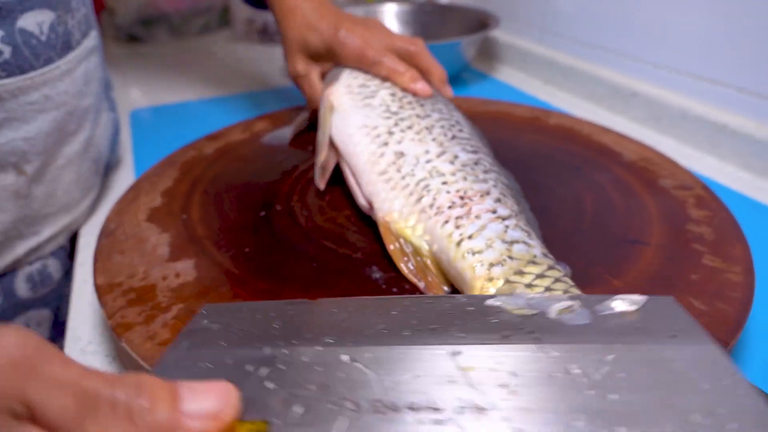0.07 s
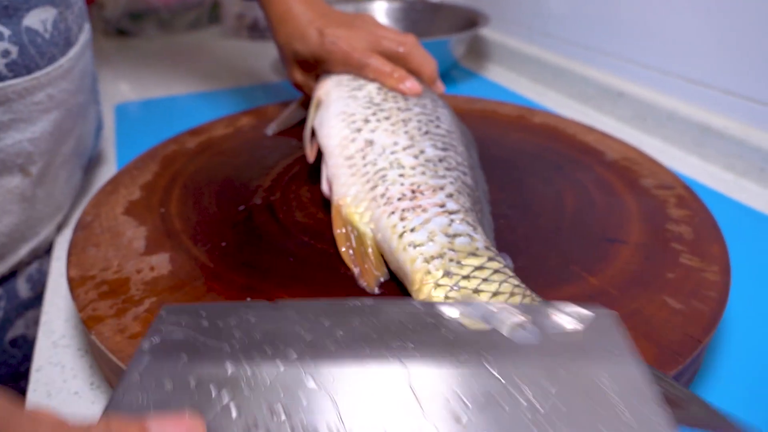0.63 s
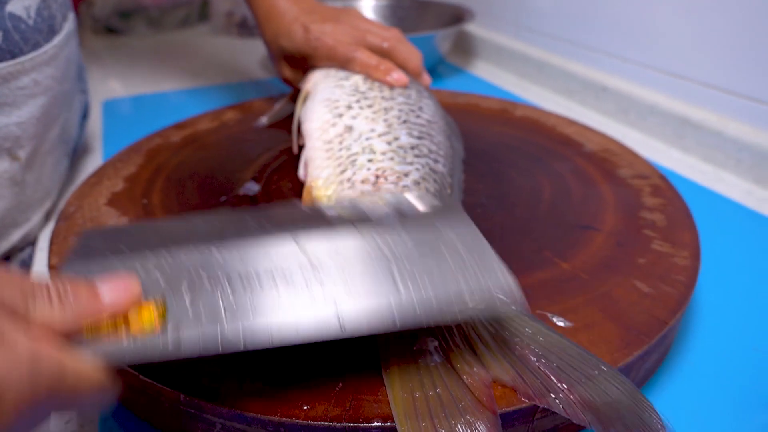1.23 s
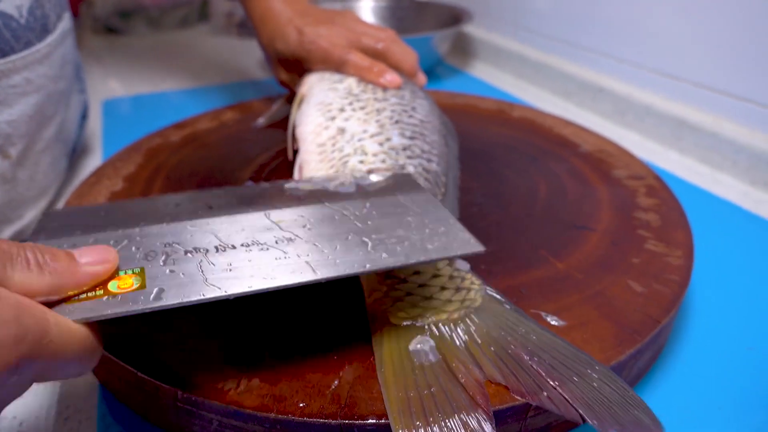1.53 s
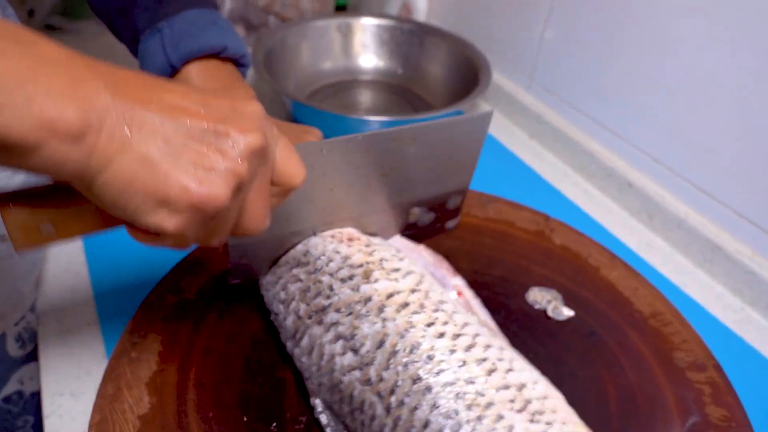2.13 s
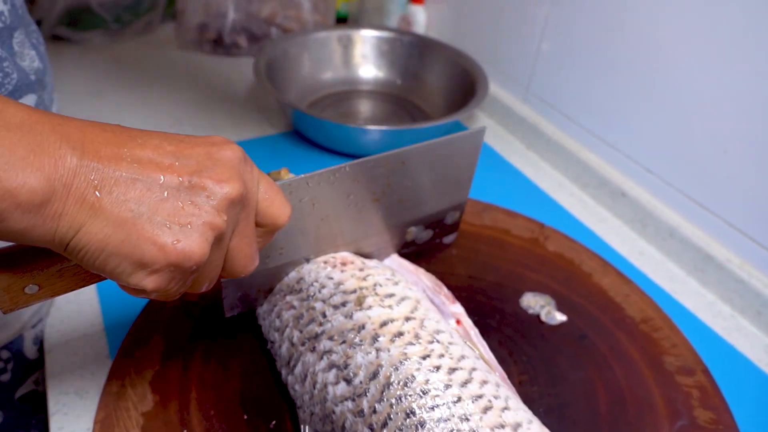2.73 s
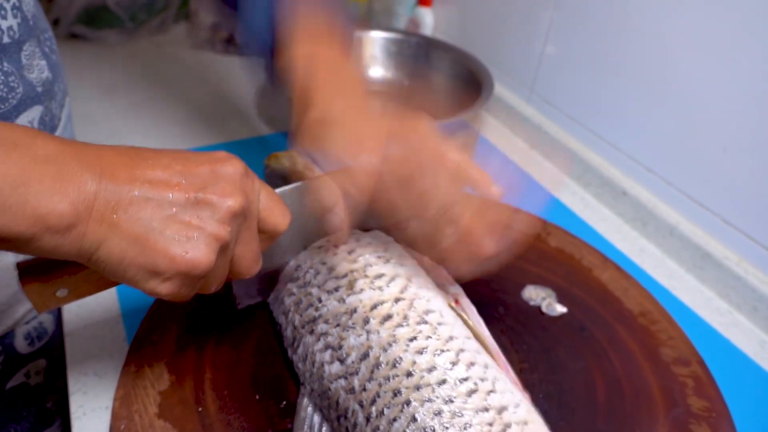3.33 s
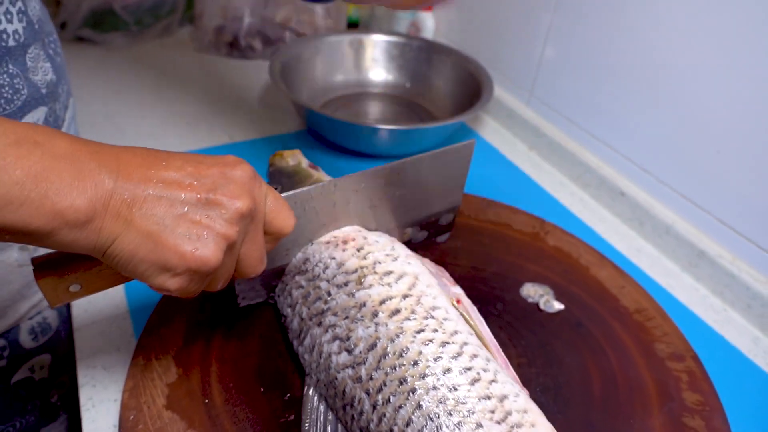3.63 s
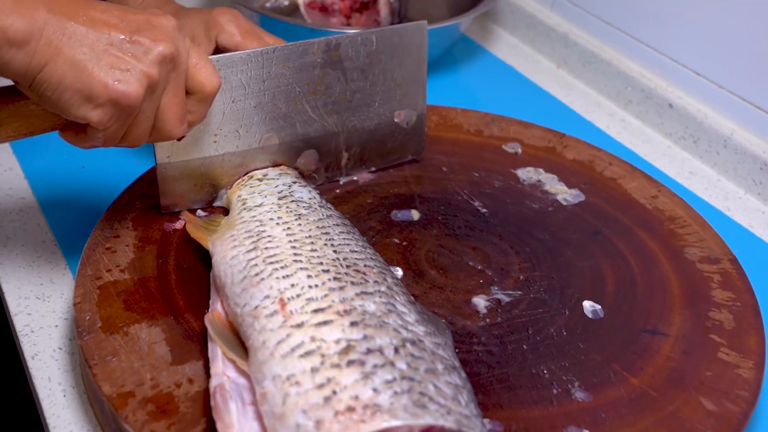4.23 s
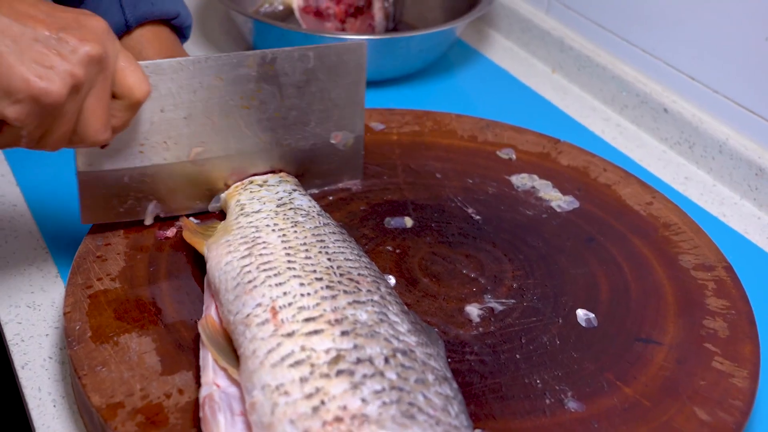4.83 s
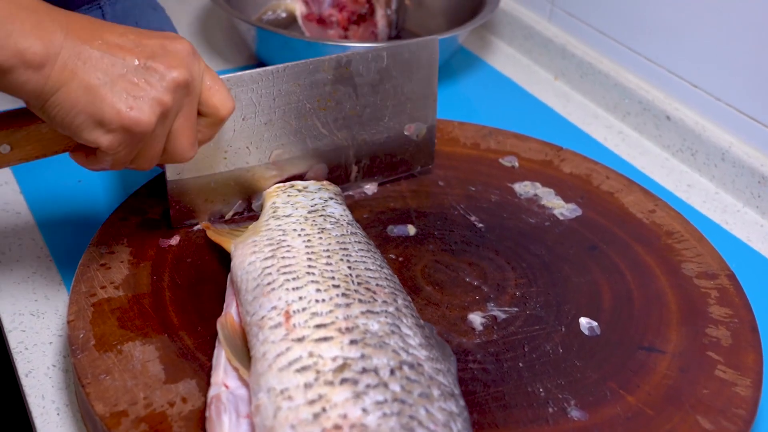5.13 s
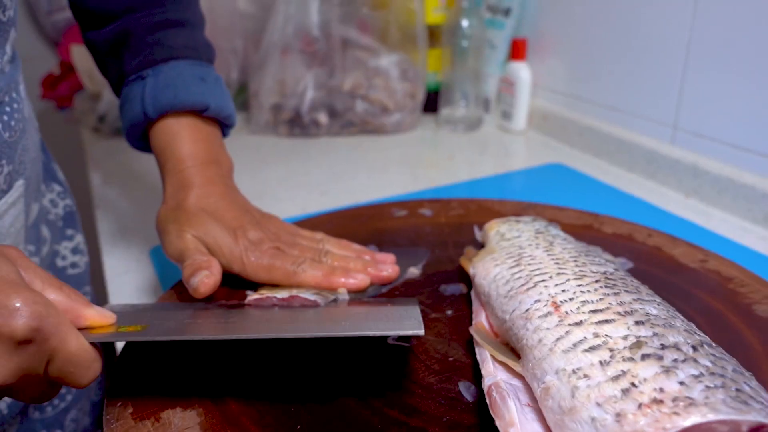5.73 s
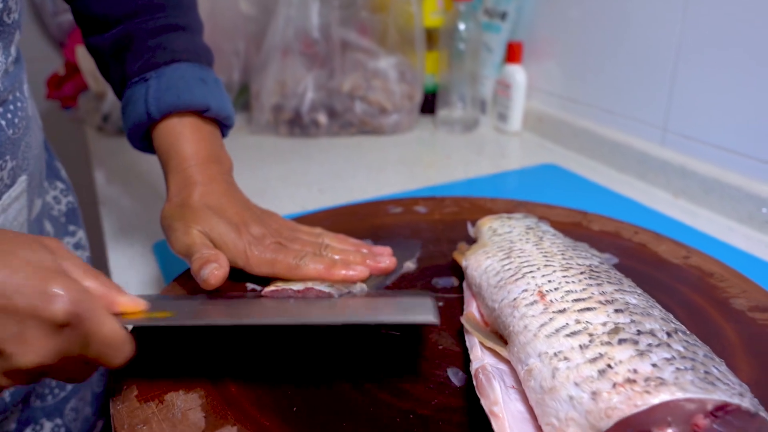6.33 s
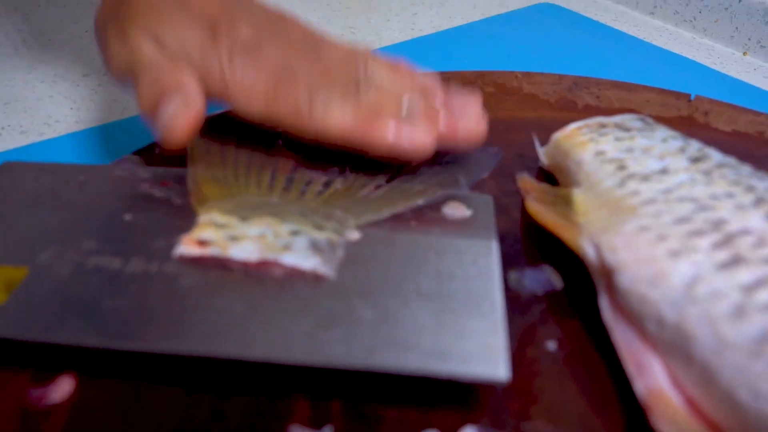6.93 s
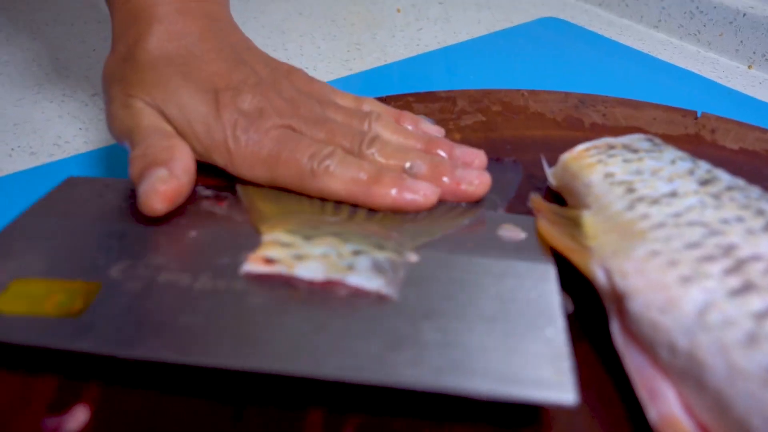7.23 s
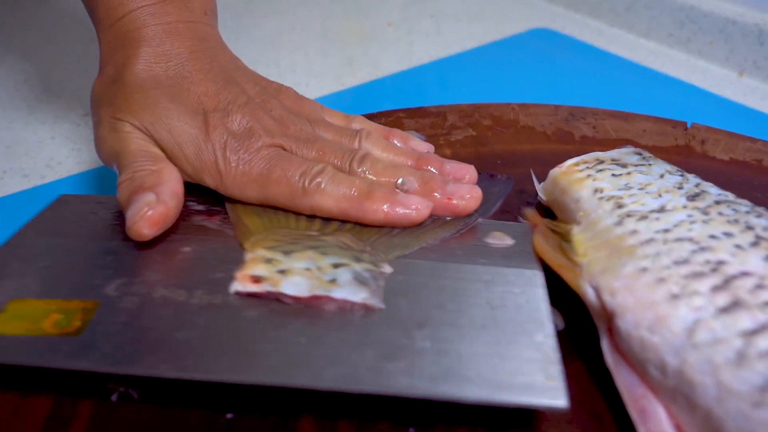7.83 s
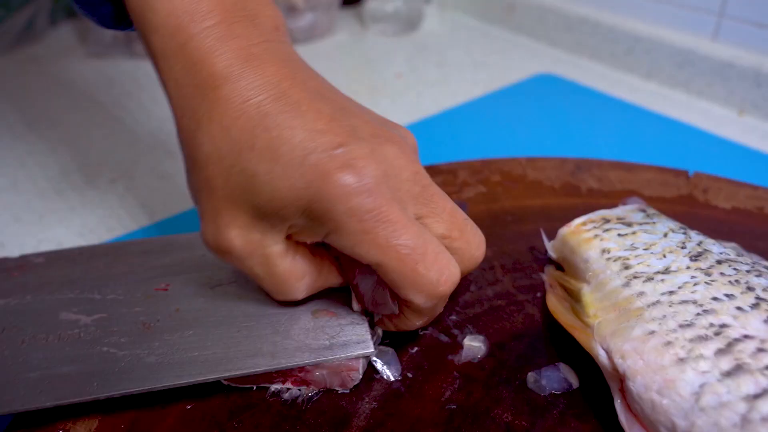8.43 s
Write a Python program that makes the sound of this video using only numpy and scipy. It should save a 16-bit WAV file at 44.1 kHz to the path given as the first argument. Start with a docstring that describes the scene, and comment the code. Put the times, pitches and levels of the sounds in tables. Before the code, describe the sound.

Crisp fish scaling strokes, crunching chops with wooden knocks, and a flat blade hissing back and forth in a small kitchen.

```python
"""A small tiled kitchen, a hand-held microphone close to a fish on a thick wooden board; air and a low hum.
First nine cleaver strokes rip scales off, crackling and snapping over the squelch of wet skin.
From 3 s the blade is pounded through backbone and tail: bone crunches, the board knocks, the counter thuds.
From 5.4 s it slides flat to and fro under the tail fin, hissing on the wet wood,
and from 7 s it rasps as it sticks and slips."""
import sys
import numpy as np
from scipy import signal
from scipy.fft import rfft, irfft, next_fast_len
from scipy.io import wavfile
from scipy.ndimage import uniform_filter1d, minimum_filter1d

SR = 44100
rng = np.random.default_rng(int(sys.argv[2]) if len(sys.argv) > 2 else 0)


def bounce(signal):
    """Save signal as a 16-bit WAV file at the path given by the first command-line argument."""
    frames = np.transpose(np.atleast_2d(signal))
    limited = np.clip(frames, -1, 1)
    pcm = np.round(limited * 32767).astype(np.int16)
    wavfile.write(sys.argv[1], SR, pcm)


N = 382788
TIME = np.arange(N) / SR
TOP_HZ = 16000

# strokes against the scales, flicks then longer draws: t/s, rise/s, fall/s, crackle/dB, flesh/dB, thud/dB
SCALING_STROKES = [(.268, .014, .02, -25.5, -35.5, -20), (.494, 0.011, .03, -17.5, -35.5, -19),
                   (.738, .012, .02, -19, -30.5, -28), (.969, 0.0082, .062, -17, -38, -29),
                   (1.208, 0.039, 0.097, -26.5, -45.5, -33), (1.483, 0.028, .08, -24.5, -43, -29),
                   (1.718, 0.034, .055, -21, -40.5, -29), (1.9, 0.1, .075, -26.5, -32, -29),
                   (2.255, .06, .085, -33, -32.5, -38)]
# the edge leant through skin and bone: t/s, rise/s, fall/s, crackle/dB, flesh/dB
SLOW_CUTS = [(2.15, .02, .2, -46, -48), (3.208, .015, .055, -28.5, -37.5), (4.53, 0.1, .15, -33.5, -43),
             (4.828, .01, .1, -40, -58), (4.89, 0.18, .05, -30.5, -26)]
# dull spectrum of flesh under the edge: f/Hz, level/dB
FLESH_SPECTRUM = [(60, -18), (150, 0), (330, -2.5), (700, -8), (1200, -12.5), (2000, -18), (5000, -28)]


def undb(db):
    """Decibels to gain."""
    return 10 ** (np.asarray(db) / 20)


def unit(x):
    """Scale to rms 1."""
    return x / np.sqrt(np.mean(x ** 2) + 1e-18)


def add(track, s, x):
    """Mix a sound into a track at s seconds."""
    i = max(int(s * SR), 0)
    track[i:i + len(x)] += x[:N - i]


def convolve(x, response):
    """Pass a track through a response."""
    return signal.fftconvolve(x, response)[:N]


def on_log_axis(hz, points):
    """Read (Hz, value) points along a log-frequency axis."""
    at, value = np.transpose(points)
    return np.interp(np.log(hz + 1e-3), np.log(at), value)


def colour(points, size=2048):
    """Minimum-phase response of energy 1 with a given spectrum."""
    gain = undb(on_log_axis(np.fft.rfftfreq(size, 1 / SR), points))
    cepstrum = irfft(np.log(gain))
    cepstrum[1:size // 2] *= 2
    cepstrum[size // 2 + 1:] = 0
    return unit(irfft(np.exp(rfft(cepstrum)))) / np.sqrt(size)


def noise(points):
    """Steady noise of rms 1 with a given spectrum."""
    size = next_fast_len(N, real=True)
    gain = undb(on_log_axis(np.fft.rfftfreq(size, 1 / SR), points))
    return unit(irfft(rfft(rng.standard_normal(size)) * gain, size)[:N])


def resonate(x, hz, q):
    """One resonance, gain 1 at its centre."""
    hz = min(hz, SR / 3)
    return signal.lfilter(*signal.iirpeak(hz, max(q, 3 * hz / SR), fs=SR), x)


def fade(t, t60):
    """Exponential decay, 60 dB down after t60 seconds."""
    return np.exp(-np.log(1000) * t / t60)


def background(air_db=-49.5, hum_db=-52, hum_hz=107):
    """Room air, a low wavering hum and the handling rumble of the microphone."""
    air_spectrum = [(53, -32), (90, -3.5), (125, -2), (239, -11), (316, -9.5), (532, -20.5), (1210, -22),
                    (1870, -26.5), (2710, -26), (8720, -31.5), (10600, -39.5), (13700, -38), (16000, -47)]  # room tone: f/Hz, level/dB
    rumble_spectrum = [(3, -15), (8, 0.5), (14, -2), (25, -14.5), (45, -22.5), (100, -32.5), (200, -51),
                       (500, -83)]  # handling noise: f/Hz, level/dB
    handling = [(0, -29.5), (4.05, -30), (5.4, -37), (6.3, -37), (6.9, -29), (8.68, -34)]  # course of the handling noise: t/s, level/dB
    hum = undb(hum_db) * unit(resonate(rng.standard_normal(N), hum_hz, q=7.6))
    air = undb(air_db) * noise(air_spectrum)
    rumble = undb(np.interp(TIME, *np.transpose(handling))) * noise(rumble_spectrum)
    return air + hum + rumble


def kitchen(x, wet_db, build_s):
    """Direct sound plus dense reflections off the tiles, which build quickly and last longest in the bass."""
    decay_times = [(100, 0.63), (400, 0.42), (1500, 0.31), (5000, 0.31), (9000, 0.3), (15000, 0.19)]  # reverberation of the room: f/Hz, t60/s
    t = TIME[:SR // 2]
    spectrum, hz = rfft(rng.standard_normal(len(t))), np.fft.rfftfreq(len(t), 1 / SR)
    centres = np.array(decay_times)[:, 0]
    tail = np.zeros(len(t))
    for share, (_, t60) in zip(np.eye(len(centres)), decay_times):
        band = irfft(spectrum * on_log_axis(hz, np.c_[centres, share]), len(t))
        tail += band * fade(t, t60)
    tail *= 1 - np.exp(-(t / build_s) ** 2)
    return x + undb(wet_db) * convolve(x, unit(tail) / np.sqrt(len(t)))


def ring(modes, detune=0., scatter_db=0.):
    """Struck modes; each strike meets them at a slightly different place and load."""
    t = TIME[:SR * 3 // 4]
    out = np.zeros(len(t))
    for k, (hz, db, t60) in enumerate(modes):
        place, load = rng.standard_normal(2)
        tone = np.sin(2 * np.pi * hz * (1 + detune * load) * t)
        out += (-1) ** k * undb(db + scatter_db * place) * fade(t, t60) * tone
    return out


def favour(modes, hz, db_per_octave=14, ring_share=1):
    """Contact excites the modes near hz most; a leaning hand cuts their ring to a share of its length."""
    return [(f, db - db_per_octave * abs(np.log2(f / hz)), t60 * ring_share) for f, db, t60 in modes]


def friction(strokes, column, per_s, spread_db, hiss, shape, catch_db, catch_s=.004):
    """Tiny uneven breaks over a hiss; each stroke swells to the level in its `column` and dies away."""
    breaks = (rng.random(N) < per_s / SR) * rng.choice([-1, 1], N)
    sizes = undb(spread_db * np.minimum(rng.exponential(size=N), 4))
    grit = unit(breaks * sizes) + hiss * rng.standard_normal(N)
    # the edge catches and lets go, so the grit comes in clusters
    grit *= undb(catch_db * unit(uniform_filter1d(rng.standard_normal(N), int(catch_s * SR))))
    out = np.zeros(N)
    for stroke in strokes:
        start, rise, fall = stroke[:3]
        during = slice(int(start * SR), int((start + rise + fall) * SR))
        push = np.interp(TIME[during] - start, [0, rise, rise + fall], [0, 1, 0]) ** shape
        out[during] += undb(stroke[column]) * unit(push * grit[during]) * np.sqrt(np.mean(push ** 2))
    return out


def mottle(x, depth_db, hold_s, bands=14):
    """Each break has its own size and pitch: neighbouring bands flare up at different moments."""
    size = next_fast_len(N, real=True)
    spectrum, hz = rfft(x, size), np.fft.rfftfreq(size, 1 / SR)
    centres = np.geomspace(1000, TOP_HZ, bands)
    out = np.zeros(N)
    for share in np.eye(bands):
        band = irfft(spectrum * on_log_axis(hz, np.c_[centres, share]), size)[:N]
        flare = unit(uniform_filter1d(rng.standard_normal(N), int(hold_s * SR)))
        out += band * unit(undb(depth_db * flare))
    return out


def squelches(jerks_per_s=900, q=2.3):
    """Wet skin drags over wood or steel in tiny jerks: a brief, roughly pitched squelch."""
    skin_drags = [(0.036, 0.31, 540, -47.5), (0.332, .061, 720, -43), (.894, .053, 728, -42.5),
                  (1.023, 0.057, 800, -43), (2.231, 0.055, 470, -41), (2.3, .09, 720, -32),
                  (4.94, 0.15, 3500, -29.5), (6.515, .14, 2900, -53)]  # squelches and squeaks: t/s, length/s, f/Hz, level/dB
    out = np.zeros(N)
    jerks = rng.standard_normal(N) * (rng.random(N) < jerks_per_s / SR)
    for s, length, hz, db in skin_drags:
        drag = jerks[int(s * SR):int((s + length) * SR)]
        pitched = unit(resonate(resonate(drag, hz, q), hz, q))
        add(out, s, undb(db) * np.hanning(len(drag)) * pitched)
    return out


def to_and_fro(bout, push_db=1.5):
    """Evenly paced strokes of the flat blade, louder pushes and softer pulls in turn."""
    bearing = [(5.46, -38.5, -47.5), (5.82, -37, -52), (6., -36, -46), (7.17, -58.5, -42.5),
               (7.32, -44.5, -36.5), (8.06, -45.5, -37), (8.21, -52, -41)]  # how hard the blade bears on the wood: t/s, hiss/dB, rasp/dB
    first, end, period, rise, fall = bout
    at, hiss_db, rasp_db = np.transpose(bearing)
    strokes = []
    for k, s in enumerate(np.arange(first, end, period)):
        accent_db = (-1) ** k * push_db
        strokes.append((s, rise * period, fall * period,
                        np.interp(s, at, hiss_db) + accent_db, np.interp(s, at, rasp_db) + accent_db))
    return strokes


def sliding(sing=0.4, sing_hz=8400):
    """Flat steel hisses over wet wood; pressed harder it rasps."""
    # two bouts of sliding: first push/s, end/s, period/s, rise/share, fall/share
    hissing_bout = (5.462, 6.1, .178, .3, .48)
    rasping_bout = (7.176, 8.3, .149, .46, .33)
    # blade set down, jabbed, drawn back, stopped and lifted clear: t/s, rise/s, fall/s, hiss/dB, rasp/dB
    single_moves = [(5.369, 0.0096, 0.031, -44, -51), (6.153, .022, .087, -38, -49),
                    (6.34, .094, .041, -46.5, -47), (6.52, .195, .03, -55, -52),
                    (8.346, .037, 0.0077, -49, -40.5), (8.535, .025, .11, -49, -59)]
    # spectra of steel on wet wood: f/Hz, level/dB
    hiss_spectrum = [(180, -38.5), (300, -4), (343, -9), (379, -3), (462, -3), (634, -17), (870, -10),
                     (2440, -11), (3080, -8), (6100, -8), (6850, -12), (8220, -5.5), (10000, -16),
                     (12300, -13.5), (16000, -19)]
    rasp_spectrum = [(240, -35), (400, -18.5), (700, -18), (1010, -14), (1260, 0.5), (1590, -8.5),
                     (1890, -4.5), (2070, -8), (2540, -6), (3760, -12.5), (4280, -12.5), (5490, -21),
                     (9000, -29), (11700, -47), (19800, -120)]
    strokes = to_and_fro(hissing_bout) + to_and_fro(rasping_bout) + single_moves
    hiss = friction(strokes, column=3, per_s=2200, spread_db=2, hiss=0.75, shape=0.54, catch_db=2.1)
    hiss += sing * resonate(hiss, sing_hz, q=29)  # the thin edge sings a little
    rasp = friction(strokes, column=4, per_s=1000, spread_db=3.5, hiss=0.73, shape=0.92, catch_db=2.5)
    rubbing = convolve(hiss, colour(hiss_spectrum)) + convolve(rasp, colour(rasp_spectrum))
    return mottle(rubbing, depth_db=3, hold_s=.014)


def judders(slip_hz=400, grit=0.69, spread_db=4.4):
    """Short runs of uneven slips ring the hand-damped blade; where it sticks decides which modes answer."""
    slip_runs = [(7.029, .0041, 1220, -29), (7.238, .018, 1980, -34.5), (7.329, .027, 1220, -34.5),
                 (7.541, .027, 2010, -28.5), (7.845, .034, 2000, -37), (8.136, .018, 1850, -30),
                 (8.377, .0085, 1290, -38.5)]  # wet steel sticking and slipping: t/s, length/s, favoured f/Hz, level/dB
    damped_modes = [(1184, -2, 0.046), (1320, 10, 0.016), (1750, 4, 0.02), (1960, 5, 0.024),
                    (2340, 4.5, 0.017), (2610, 3.5, 0.028), (4280, -5, .01)]  # the blade pressed flat: f/Hz, level/dB, t60/s
    out, t = np.zeros(N), TIME[:SR // 12]
    for s, length, hz, db in slip_runs:
        one_slip = ring(favour(damped_modes, hz), detune=0.02)[:len(t)]
        one_slip += grit * rng.standard_normal(len(t)) * fade(t, t60=0.0061)
        slips = np.zeros(len(t))
        for at in np.arange(0, length, 1 / slip_hz):
            slips[int((at + rng.random() / slip_hz) * SR)] += undb(spread_db * rng.standard_normal())
        judder = unit(signal.fftconvolve(slips, one_slip)[:len(t)])
        add(out, s, undb(db) * judder * np.sqrt(length / t[-1]))
    return out


def chance_snaps(per_stroke=2, stray_ticks=26, spread_db=4, low_hz=1800, high_hz=10000):
    """Lesser snaps within each scrape or slow cut, and faint wet ticks anywhere: t/s, level/dB, f/Hz."""
    # snaps centre 10 dB above their stroke's crackle, up to a limit
    spans = per_stroke * [(s, rise + fall, min(db + 10, -22))
                          for s, rise, fall, db, *_ in SCALING_STROKES + SLOW_CUTS]
    spans += stray_ticks * [(0.00037, TIME[-1], -39)]
    return [(s + when * length, db + spread_db * (2 * strength - 1), low_hz * (high_hz / low_hz) ** pitch)
            for (s, length, db), (when, strength, pitch) in zip(spans, rng.random((len(spans), 3)))]


def snaps(gain_db=1, low_hz=800, splinter_t60=0.0086, ping=0.3, ping_t60=0.014):
    """Scale or bone breaks with a splintering click and a brief ping; so small a part radiates no bass."""
    clear_snaps = [(.7422, -9, 3280), (.7526, -5.5, 3340), (.7836, -11, 3890), (.9732, -12, 8560),
                   (1.1064, -15, 5000), (1.2156, -21, 1230), (1.269, -9, 3860), (1.453, -26, 2740),
                   (1.548, -13, 7740), (1.8692, -29, 1250), (1.991, -8, 2050), (2.0059, -11.5, 3300),
                   (2.3436, -12, 3530), (2.3781, -14, 5200), (4.0032, -25, 1070), (4.111, -4, 10500),
                   (4.563, -21, 7970), (4.6397, -16, 6240), (5.0753, -2, 3860), (6.076, -27, 7950),
                   (6.1664, -24, 2310), (6.2927, -27, 2290), (6.7379, -27, 1500), (7.0493, -27, 1270),
                   (8.57, -29, 6000)]  # the clearest snaps and ticks of the edge: t/s, level/dB, f/Hz
    out, t = np.zeros(N), TIME[:SR // 40]
    low_cut = signal.butter(2, low_hz, "high", fs=SR, output="sos")
    for s, db, hz in clear_snaps + chance_snaps():
        splinters = rng.standard_normal(len(t)) * fade(t, splinter_t60)
        click = signal.sosfilt(low_cut, resonate(splinters, hz, q=0.82))
        tone = ping * fade(t, ping_t60) * np.sin(2 * np.pi * hz * t)
        add(out, s, undb(db + gain_db) * (click / np.abs(click).max() + tone))
    return out


def scraping(touch_s=.008, touch_db=-23, skim_rise_s=0.047, skim_fall_s=0.082, skim_db=-20.5):
    """The edge touches, bites and skims on; scales tear out one by one and tug at the flesh beneath."""
    scale_spectrum = [(410, -28.5), (700, -9.5), (863, -7.5), (1500, 1), (1750, -4.5), (2020, -5),
                      (2370, -3), (3410, 1), (4670, -1.5), (5190, 1), (8100, 0.5), (10300, -8), (13100, -6),
                      (16000, -16)]  # tearing scales: f/Hz, level/dB
    strokes = []
    for s, rise, fall, db, flesh_db, _ in SCALING_STROKES:
        strokes += [(s - touch_s, touch_s, rise, db + touch_db, flesh_db + touch_db),
                    (s, rise, fall, db, flesh_db),
                    (s + rise, skim_rise_s, skim_fall_s, db + skim_db, flesh_db + skim_db)]
    crackle = friction(strokes, column=3, per_s=1900, spread_db=2.8, hiss=0.38, shape=1.16, catch_db=1)
    flesh = friction(strokes, column=4, per_s=900, spread_db=3, hiss=0.42, shape=0.92, catch_db=2.5)
    crackle = mottle(crackle, depth_db=3.5, hold_s=.008)
    return convolve(crackle, colour(scale_spectrum)) + convolve(flesh, colour(FLESH_SPECTRUM))


def cutting(crack_fall_s=.014, crunch_lag_s=0.013, crunch_rise_s=0.019):
    """Bone crunches and flesh smacks under the edge; a chop cracks first and crunches as the blade sinks."""
    # blade pounded into bone: t/s, bite/s, crack/dB, crunch fall/s, crunch/dB, flesh over bone/dB
    chops = [(2.972, 0.0087, -16.5, .035, -20, 8.5), (3.402, 0.0096, -13, 0.069, -25.5, 1),
             (3.777, .006, -12, .02, -36, 3), (4.108, .002, -5.5, 0.096, -22, 6.5)]
    bone_spectrum = [(530, -29), (900, -20), (1270, -4.5), (1570, -5.5), (1980, -5), (2750, -3.5),
                     (4900, -2.5), (8040, -6.5), (8730, -2), (10300, -16.5), (12900, -10.5), (15000, -26)]  # breaking bone: f/Hz, level/dB
    cuts = list(SLOW_CUTS)
    for s, bite, crack_db, crunch_fall, crunch_db, flesh_db in chops:
        cuts.append((s, bite, crack_fall_s, crack_db, crack_db + flesh_db))
        cuts.append((s + crunch_lag_s, crunch_rise_s, crunch_fall, crunch_db, crunch_db + flesh_db))
    crackle = friction(cuts, column=3, per_s=2400, spread_db=3.5, hiss=0.58, shape=0.88, catch_db=1.5)
    flesh = friction(cuts, column=4, per_s=1500, spread_db=2, hiss=0.47, shape=1.31, catch_db=2.5)
    crackle = mottle(crackle, depth_db=3.5, hold_s=.009)
    return convolve(crackle, colour(bone_spectrum)) + convolve(flesh, colour(FLESH_SPECTRUM))


def shoves(hz=71.2, ring_share=0.39, board_offset_db=-22, blade_offset_db=-27):
    """Halfway up its rise each scaling stroke gives the board a soft blow; rows for blows()."""
    return [(s + rise / 2, hz, thud_db, ring_share, flesh_db + board_offset_db, db + blade_offset_db)
            for s, rise, _, db, flesh_db, thud_db in SCALING_STROKES]


def blows(knock_over_board_db=29):
    """Each blow shakes the counter, knocks the board and rings the blade."""
    # blows reaching the board: t/s, thud f/Hz, thud/dB, counter's free ring/share, board/dB, blade/dB
    strikes = [(1.907, 140, -31, .4, -42, -51), (1.995, 100, -27, .5, -51, -37),
               (2.972, 290, -10, .24, -30, -47), (2.977, 100, -12, .45, -25, -26.5),
               (3.406, 101, -9.5, .7, -28, -24), (3.78, 68.7, -6, .45, -41, -41),
               (4.109, 70, -17.5, 1., -18, -29), (4.148, 172, -9, .96, -26, -32),
               (4.673, 140, -20.5, .7, -6.5, -45), (5.066, 66, -20, .55, -32, -52),
               (6.737, 111, -36, .22, -44, -65), (7.031, 71.6, -18.5, .25, -50, -59)]
    # modes of the counter, the wooden board and the free blade: f/Hz, level/dB, t60/s
    counter_modes = [(50.7, 9.5, 0.43), (67.3, 1.5, 0.49), (94.9, 2.5, .55), (108.84, -4.5, 0.88),
                     (147, -2.5, 0.36), (239.7, -6.5, 0.36), (327.3, 3.5, 0.27)]
    board_modes = [(273, -16.5, 0.21), (327, -12, 0.24), (482.6, -2, 0.16), (571, -13, 0.18),
                   (687, -15, 0.3), (753, -3, 0.071), (905, -27.5, 0.15), (1044, -10.5, 0.2),
                   (1140, -7, 0.044)]
    blade_modes = [(1204, -6, 0.16), (1355, -15, 0.35), (1805, -1.5, 0.15), (1930, 0.5, 0.21),
                   (2100, -3, 0.16), (2540, -15, .2), (2950, -2, 0.14), (3460, -4, 0.094), (5017, -6, 0.17)]
    knock_spectrum = [(80, 9.5), (250, 0), (500, -3), (1150, 5), (1450, -8), (2100, -8.5), (2700, -39),
                      (8000, -36)]  # steel meeting wood: f/Hz, level/dB
    out, knock = np.zeros(N), colour(knock_spectrum)
    for s, hz, thud_db, ring_share, board_db, blade_db in strikes + shoves():
        # the counter modes nearest each blow's thud pitch answer most
        thud = ring(favour(counter_modes, hz, ring_share=ring_share), detune=0.013)
        add(out, s, undb(thud_db) * thud)
        add(out, s, undb(board_db) * ring(board_modes, detune=0.0074, scatter_db=-0.3))
        add(out, s, undb(board_db + knock_over_board_db) * knock)
        add(out, s, undb(blade_db) * ring(blade_modes, detune=0.0038, scatter_db=4.5))
    return out


def scene():
    """The work on the board from close by, in mono, with the kitchen well behind the direct sound."""
    blade_work = scraping() + cutting() + snaps() + sliding() + judders() + squelches()
    blade_work = kitchen(blade_work, wet_db=-13, build_s=.014)
    pounding = kitchen(blows(), wet_db=-12.5, build_s=0.0027)
    return (blade_work + pounding + background())[None]


def record(dry):
    """A fast limiter holds the blows to about full scale; a steep low-pass cuts the top."""
    needed_gain = 1 / np.maximum(np.abs(dry), 1)
    gain = uniform_filter1d(minimum_filter1d(needed_gain, size=129), size=129)
    top_cut = signal.ellip(8, .2, 70, TOP_HZ, fs=SR, output="sos")
    return signal.sosfilt(top_cut, dry * gain)


dry = scene()
out = record(dry)
bounce(out)
```